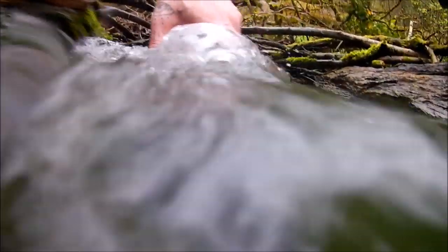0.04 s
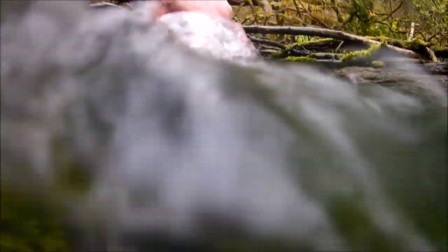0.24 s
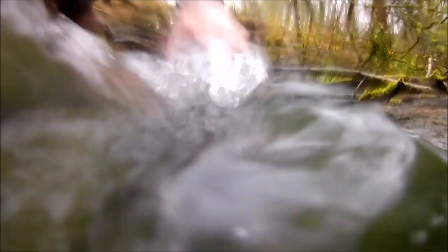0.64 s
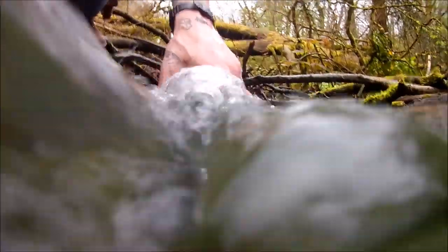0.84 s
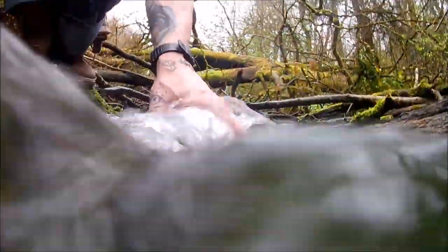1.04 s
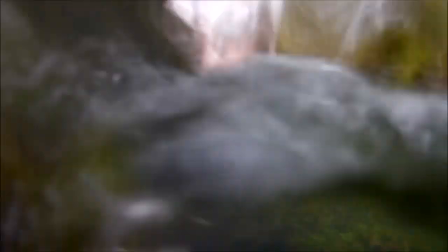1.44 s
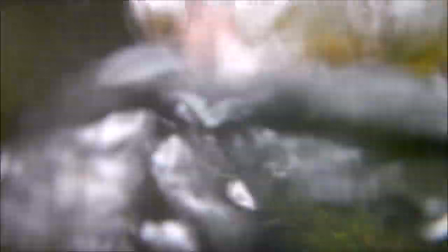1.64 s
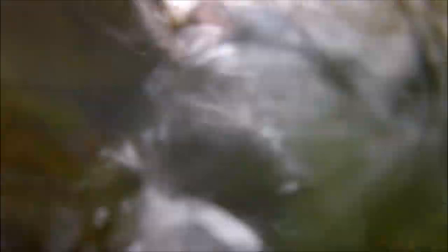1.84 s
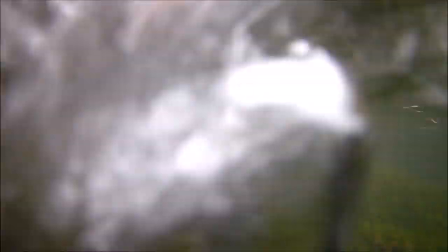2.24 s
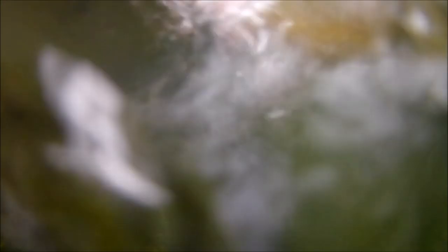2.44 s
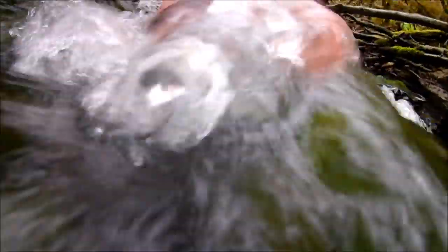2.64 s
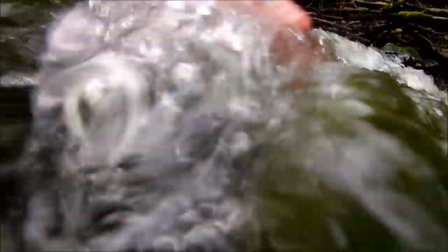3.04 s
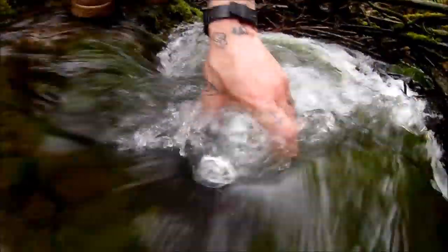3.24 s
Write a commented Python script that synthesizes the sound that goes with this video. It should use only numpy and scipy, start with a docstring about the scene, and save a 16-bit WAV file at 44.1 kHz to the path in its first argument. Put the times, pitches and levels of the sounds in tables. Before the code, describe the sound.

Fast stream water bubbles and splashes right against the microphone as a bottle fills. Dull underwater gulps come first, then bright crackles and drops knocking at the surface, and last an airy rushing hiss.

```python
"""Filling a bottle at the waterline

A camera rides in a fast stream while a hand fills a bottle just ahead of it. Submerged, it hears
muffled gulps ring its housing. At the surface, water slaps and crackles on the housing and bubbles
ping against it. Lifted clear, it hears the fizzing rush. The level dips briefly twice."""
import sys
import numpy as np
from scipy import signal
from scipy.fft import rfft, irfft, next_fast_len
from scipy.io import wavfile
from scipy.ndimage import map_coordinates

SR = 44100
rng = np.random.default_rng(int(sys.argv[2]) if len(sys.argv) > 2 else 0)


def wav_record(signal):
    """Record a signal, one row per channel, as 16-bit PCM in the file named by sys.argv[1]."""
    frames = np.transpose(np.atleast_2d(signal))
    bounded = np.clip(frames, -1, 1)
    # unit amplitude maps onto the largest positive 16-bit level
    quanta = np.round(bounded * 32767).astype(np.int16)
    wavfile.write(sys.argv[1], SR, quanta)


N = 145530
SURFACE_S, CLEAR_S = .5, 2.626  # the camera breaks the surface; it is lifted clear

# Levels in the tables are relative, within each layer.
# swell of the open rush: t/s, level/dB
RUSH_SWELL = [(2.63, -35), (2.79, -34), (2.82, -29.5), (3.04, -32), (3.07, -26.5), (3.13, -31),
              (3.18, -33.5), (3.25, -33), (3.3, -39)]
# swell of the crackle at the waterline: t/s, level/dB
CHURN_SWELL = [(.51, -46), (.55, -29), (.62, -37.5), (.70, -28.5), (.76, -34.5), (.84, -37), (1.0, -39.5),
               (1.16, -38), (1.52, -39), (1.57, -28), (1.62, -37), (1.80, -34), (2.03, -42), (2.14, -40.5),
               (2.50, -38), (2.57, -41)]
# air pockets thumping the housing: t/s, level/dB
AIR_THUMPS = [(.047, -11), (0.3107, 1.5), (0.3898, -11)]
# large underwater bubbles: t/s, f/Hz, level/dB, t60/s
GULP_CUES = [(0.0472, 1400, -10, 0.018), (0.115, 5140, -20.5, 0.011), (0.135, 2040, -21, 0.019),
             (0.2322, 813, -13.5, 0.034), (0.2747, 1770, 3, 0.029), (0.3112, 1676, 2, 0.014),
             (0.3174, 1640, -11, 0.01), (0.3707, 873, -12.5, 0.11), (0.3713, 600, -9.5, 0.06),
             (0.388, 5310, -20.5, 0.013), (0.3899, 1740, 1, 0.0082), (0.428, 1270, -11.5, 0.0073),
             (0.434, 870, -4, 0.0043), (0.4626, 1290, -24, 0.037)]
# modes of the submerged housing: f/Hz, level/dB, t60/s
HOUSING_MODES = [(568, 0, 0.054), (916, -4, 0.052), (1277, -0.5, 0.045), (1760, -6.5, 0.042)]
# bubbles pinching off at the surface: t/s, f/Hz, level/dB
PING_CUES = [(0.534, 3220, -11.5), (0.549, 4120, -11.5), (0.582, 2620, -13.5), (0.6417, 6280, -2),
             (0.6926, 6240, 2.5), (0.7816, 2820, -9), (0.859, 3030, -13), (1.0787, 3320, -13.5),
             (1.149, 7450, -4), (1.3749, 9430, -5), (1.5663, 14900, -13), (1.5797, 6250, -2),
             (1.6275, 14300, -13), (1.71, 2720, -10), (1.8126, 6480, 0), (1.8472, 6080, -1.5),
             (1.8772, 3280, -12), (1.9553, 6380, -8.5), (2.0005, 2590, -16.5), (2.0446, 2450, -15.5),
             (2.0712, 3360, -15), (2.0795, 6500, -10), (2.0854, 14100, -13.5), (2.2056, 3320, -15.5),
             (2.2188, 2260, -21.5), (2.2797, 6340, -10.5), (2.33, 14800, -11.5), (2.3579, 2620, -13.5),
             (2.484, 5240, -12.5), (2.5049, 6260, -1.5), (2.5338, 6100, -8.5), (2.6015, 2330, -8),
             (2.6468, 5020, -8), (2.649, 11940, -9.5), (2.6582, 4800, -14), (2.684, 4100, -15.5),
             (2.8821, 5280, -10.5), (3.096, 3580, -13), (3.2201, 4280, -11.5)]
# drops hitting the housing: t/s, level/dB, spray trim/dB
SLAP_CUES = [(0.542, -7, 6.5), (0.5508, -8, 4), (0.6591, -10.5, 12), (0.6705, -11, -31.5), (0.685, -8, 4),
             (0.7017, -7, -21), (0.7565, -12, -8), (0.7807, 4.5, -4), (0.81, 2, 6), (0.826, -7.5, 6),
             (0.9538, -10.0, -24.5), (1.1014, -10, -26), (1.149, -8, 6), (1.1635, -5.5, -54),
             (1.1848, -11, 11.5), (1.3376, -11.5, -15), (1.5682, -7, 3.5), (2.023, -12, 12.5),
             (2.3115, -12, 4), (2.3755, -17, 16.5), (2.5931, -5.5, 11), (2.6025, -6.5, 13)]
# brief dips in the whole mix: start/s, end/s
DIPS = [(0.479, .512), (1.649, 1.681)]
# tone of the stream in open air: f/Hz, level/dB
RUSH_EQ = [(25, -37), (90, -6.5), (200, -13), (450, -8.5), (630, -2), (850, -13.5), (2000, -17), (3000, -8),
           (4200, -10), (5700, -4), (6700, -6.5), (7700, -19.5), (9500, -17.5), (12600, -32.5),
           (15000, -24.5)]
# dull underwater tone: f/Hz, level/dB
BURBLE_EQ = [(25, 4.5), (90, 1.5), (200, -1.5), (400, -11.5), (570, -3.5), (720, -17.5), (1400, -11.5),
             (2500, -18), (5500, -36), (8000, -45.5)]
# low body of the slosh: f/Hz, level/dB
SLOSH_EQ = [(25, -33), (70, 0), (300, -2), (600, -4), (1400, -19.5), (4000, -35)]
# tone of foam on the housing: f/Hz, level/dB
CRACKLE_EQ = [(200, -12), (600, -14), (1500, -5), (2200, -2.5), (3300, -2.5), (4400, -14), (6300, 2),
              (7400, -17.5), (9400, -11.5), (12600, -39.5), (15500, -24)]
# tone of a knock on the housing: f/Hz, level/dB
KNOCK_EQ = [(40, -8.5), (300, -7.5), (600, -4), (1300, -5), (1800, -0.5), (2170, 5), (2700, -4), (3300, -1),
            (5000, -55), (15000, -66)]
# bright edge of ticks and spray: f/Hz, level/dB
CLICK_EQ = [(1500, -16.5), (4000, -4), (5400, -12.5), (6300, 3.5), (7400, -8.5), (9200, -1.5),
            (11500, -26.5), (15500, -29)]


def amp(db):
    """Decibels to gain."""
    return 10 ** (np.asarray(db) / 20)


def unit(x):
    """x at rms 1."""
    return x / np.sqrt(np.mean(x ** 2) + 1e-20)


def automation(points):
    """Straight ramps between (time, value) points."""
    return np.interp(np.arange(N) / SR, *np.transpose(points))


def after(s):
    """A 4 ms fade-in centred on time s."""
    return np.clip((np.arange(N) / SR - s) / .004 + .5, 0, 1)


def wobble(rate):
    """A smooth random curve, rate knots a second."""
    return map_coordinates(rng.standard_normal(4096), [np.arange(N) * rate / SR], mode="wrap")


def add(track, s, sound):
    """Mix a sound into the track at time s."""
    part = track[max(round(s * SR), 0):][:len(sound)]
    part += sound[:len(part)]


def response(eq, half=2048):
    """Minimum-phase impulse response of an EQ curve, at energy 1."""
    hz, db = np.transpose(eq)
    grid = np.fft.rfftfreq(2 * half, 1 / SR)
    gain = amp(np.interp(np.log(grid + 1), np.log(hz), db))
    cepstrum = irfft(np.log(gain))
    cepstrum[1:half] *= 2
    cepstrum[half + 1:] = 0
    impulse = irfft(np.exp(rfft(cepstrum)))
    return impulse / np.linalg.norm(impulse)


def coloured(x, eq):
    """x through an EQ curve, at rms 1."""
    return unit(signal.fftconvolve(x, response(eq))[:N])


def bubble(t, hz, t60, rise, attack):
    """A damped sine that starts softly, dies ever faster and climbs by the share rise per t60."""
    phase = 2 * np.pi * hz * (t + rise * t * (t / t60 - .5) / 2)
    return np.sin(phase) * amp(-60 * (t / t60) ** 1.107) * (1 - np.exp(-t / attack)) ** 2


def sizes(chance, spread_db):
    """Uniform draws to gains: many small, few large."""
    return amp(-spread_db * np.log(chance + .035))


def swarm(count, low_hz, high_hz, cycles, spread_db, rise):
    """Small bubbles at random moments and pitches, most chirping upward, at rms 1."""
    when, pitch, size, life, climb = rng.random((count, 5)).T[..., None]
    hz = low_hz * (high_hz / low_hz) ** pitch
    t60 = cycles * (.5 + life) / hz
    k = np.arange(SR // 60)
    rings = sizes(size, spread_db) * bubble(k / SR, hz, t60, rise * (2 * climb - .5), 1 / hz)
    samples = (when * N).astype(int) + k
    return unit(np.bincount(samples.ravel(), rings.ravel(), N)[:N])


def patter(count, spread_db):
    """Tiny impacts at random moments, at rms 1."""
    when, size, sign = rng.random((count, 3)).T
    hits = sizes(size, spread_db) * np.sign(sign - .5)
    return unit(np.bincount((when * N).astype(int), hits, N))


def rush():
    """Open-air bed: the stream breaks over hand and bottle in fizz, droplet ticks and babble."""
    fizz = swarm(count=7000, low_hz=2000, high_hz=15450, cycles=11, spread_db=7, rise=.026)
    babble = swarm(count=1300, low_hz=2385, high_hz=3560, cycles=34, spread_db=3, rise=.16)
    drops = amp(-3) * patter(count=1500, spread_db=5)
    hiss = amp(-2.5) * rng.standard_normal(N)
    water = coloured(unit(np.gradient(fizz)) + drops + hiss, RUSH_EQ) + amp(-12.5) * babble
    return amp(automation(RUSH_SWELL) + 2 * wobble(40)) * water * after(CLEAR_S)


def burble():
    """Underwater bed: a dull wash of small bubbles with faint ticks on top."""
    small = swarm(count=700, low_hz=597, high_hz=2990, cycles=18.5, spread_db=9.5, rise=.14)
    wash = coloured(rng.standard_normal(N) + small, BURBLE_EQ)
    ticks = amp(-26) * coloured(patter(count=70, spread_db=3), CLICK_EQ)
    return amp(-33.5 + wobble(19.4)) * (wash + ticks) * (1 - after(SURFACE_S))


def churn():
    """Waterline bed: foam crackles, spatter knocks the housing, small bubbles ring, water sloshes."""
    swell_db, surge_db = automation(CHURN_SWELL), wobble(55)
    foam = swarm(count=6000, low_hz=1017, high_hz=17860, cycles=17.6, spread_db=6, rise=.4)
    grit = amp(-4.5) * patter(count=5000, spread_db=9)
    crackle = coloured(unit(np.gradient(foam)) + grit, CRACKLE_EQ)  # the gradient brightens the foam
    knocks = coloured(patter(count=600, spread_db=7), KNOCK_EQ)
    mids = amp(-.5) * swarm(count=900, low_hz=1949, high_hz=4220, cycles=35.6, spread_db=6, rise=.32)
    highs = amp(-6) * swarm(count=300, low_hz=4600, high_hz=7500, cycles=67, spread_db=8.5, rise=.069)
    fizz = amp(-10) * swarm(count=400, low_hz=6700, high_hz=10900, cycles=78, spread_db=8.5, rise=.03)
    air = amp(-14) * swarm(count=260, low_hz=10080, high_hz=16200, cycles=60, spread_db=6.5, rise=.05)
    spray = amp(swell_db + 2 * surge_db) * (crackle + knocks + mids + highs + fizz + air)
    # the low slosh rides the same moves at half the depth
    slosh = amp(-22 + swell_db / 2 + surge_db) * coloured(rng.standard_normal(N), SLOSH_EQ)
    return (spray + slosh) * after(SURFACE_S) * (1 - after(CLEAR_S))


def thumps(width_s=.00016):
    """Air pockets hit the submerged housing: a short push, then a shallow rebound."""
    track = np.zeros(N)
    u = np.arange(SR // 10) / SR / width_s
    for s, db in AIR_THUMPS:
        add(track, s, amp(db) * u ** 3 * (1 - u / 4) * np.exp(-u))
    return track


def gulps(pitch_waver=.042):
    """Large underwater bubbles sound a wavering note and set the housing ringing."""
    track, t = np.zeros(N), np.arange(SR // 10) / SR
    for s, hz, db, t60 in GULP_CUES:
        housing = sum(amp(mode_db + rng.normal()) * bubble(t, mode_hz, life, rise=0, attack=.00013)
                      for mode_hz, mode_db, life in HOUSING_MODES)
        warped_t = np.abs(t + np.cumsum(pitch_waver * wobble(500)[:len(t)]) / SR)
        note = bubble(warped_t, hz, t60, rise=.017, attack=.00054)
        add(track, s, amp(db) * (note + amp(-19) * housing))
    return track


def pings():
    """Close-up bubbles, each with three chirping companions; the smaller, the higher and shorter."""
    track, t = np.zeros(N), np.arange(SR // 20) / SR
    for s, hz, db in PING_CUES:
        t60 = .019 * 2800 / hz  # 19 ms at 2800 Hz
        add(track, s, amp(db) * bubble(t, hz, t60, rise=.014, attack=.00012))
        for lag, detune, climb in rng.standard_normal((3, 3)):
            companion = bubble(t, hz * np.exp(.12 * detune), t60, rise=.14 * (1 + climb), attack=1 / hz)
            add(track, s + .007 * lag, amp(-16 + db / 2) * companion)
    return track


def slaps(spray_t60_s=.0068):
    """Each drop knocks the housing and bursts into a flick of bright spray."""
    track, t = np.zeros(N), np.arange(SR // 50) / SR
    knock, click = response(KNOCK_EQ), response(CLICK_EQ)
    for s, db, spray_db in SLAP_CUES:
        burst = rng.standard_normal(len(t)) * amp(-60 * t / spray_t60_s)
        spray = signal.fftconvolve(click, burst / np.linalg.norm(burst))[:len(knock)]
        add(track, s, amp(db + 10) * (knock + amp(spray_db - 11) * spray))
    return track


def scene(dip_db=-26):
    """Under water, waterline, open air: one centred mix that dips twice."""
    water = gulps() + thumps() + burble() + churn() + slaps() + pings() + rush()
    dipped = sum(after(start) - after(end) for start, end in DIPS)
    water *= amp(dip_db * dipped)
    return np.array([water, water])


def record(dry, top_hz=16300):
    """Hard-clip the hottest peaks, then cut everything above top_hz."""
    padded = next_fast_len(N + SR // 2)
    spectrum = rfft(np.clip(dry, -1, 1), padded)
    passband = np.fft.rfftfreq(padded, 1 / SR) < top_hz
    return irfft(spectrum * passband, padded)[:, :N]


dry = scene()
out = record(dry)
wav_record(out)
```